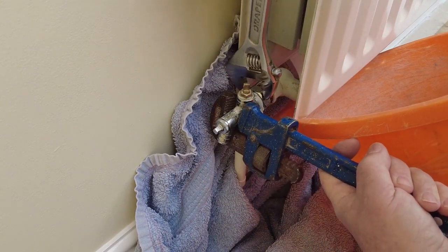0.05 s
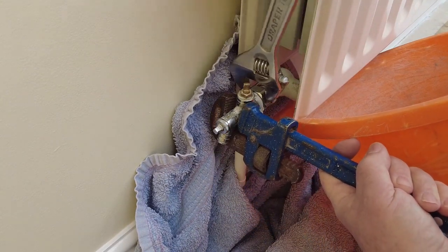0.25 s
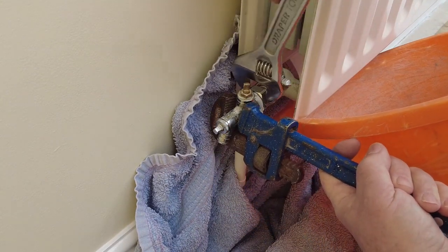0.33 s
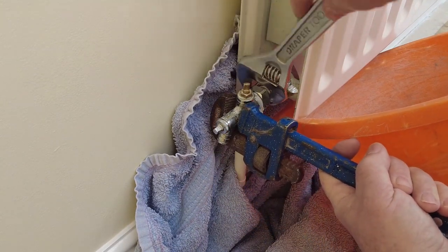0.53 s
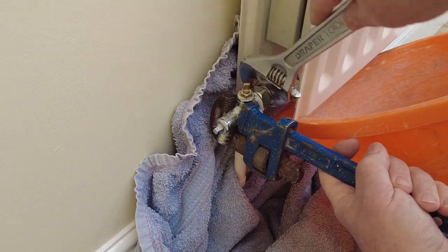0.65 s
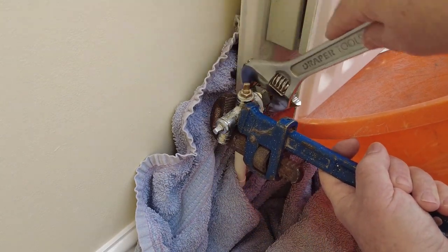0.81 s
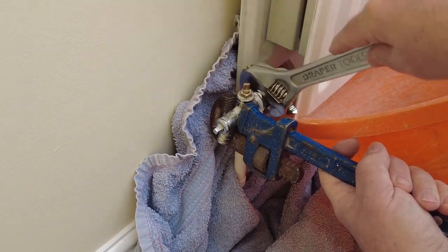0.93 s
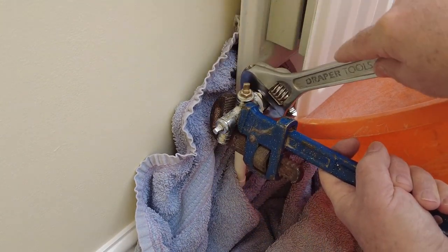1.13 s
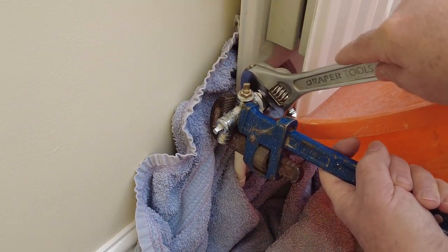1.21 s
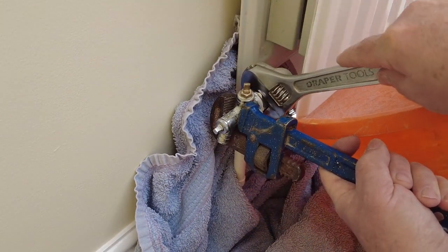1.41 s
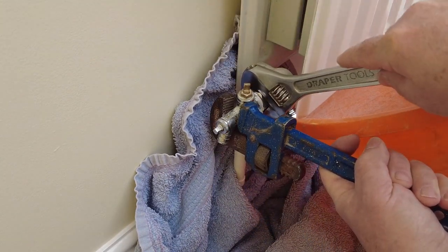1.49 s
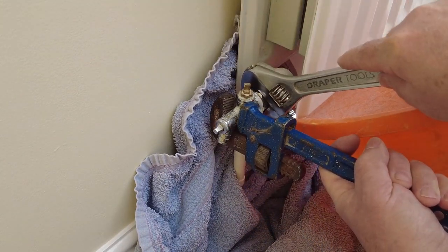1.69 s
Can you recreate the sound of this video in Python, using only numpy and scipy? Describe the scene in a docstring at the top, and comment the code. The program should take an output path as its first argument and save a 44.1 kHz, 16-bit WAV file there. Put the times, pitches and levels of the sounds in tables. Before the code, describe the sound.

A wrench knocks sharply on a radiator valve in a small room, heard close in stereo; faint rubbing and a short squeak lead in, the panel rings hollowly, then a softer knock follows over low hum.

```python
"""A small room, close to the valve of a steel panel radiator that two wrenches work on, in stereo.
A jaw rubs round the nut as a stream of tiny random slips, with hiss, rasp and squeaks.
It slips and knocks home with sharp clicks, then knocks again more softly; each knock is a force pulse
that sets the panel's modes ringing, while clicks excite a cracking, ringing wrench and the room's tail.
Underneath, a wavering low hum swells and fades amid rumble, faint tones and still air."""
import sys
import numpy as np
from scipy import signal
from scipy.io import wavfile

SR = 44100
rng = np.random.default_rng(int(sys.argv[2]) if len(sys.argv) > 2 else 0)


def materialize(psi):
    """Save the field psi as 16-bit PCM at rate SR to the path in sys.argv[1].

    A 1-D psi becomes a single channel; in a 2-D psi each row is a channel.
    """
    bounded = np.clip(np.atleast_2d(psi).T, -1, 1)
    quanta = np.round(bounded * 32767).astype(np.int16)
    wavfile.write(sys.argv[1], SR, quanta)


N = 77175  # samples
T = np.arange(N) / SR  # time in s

# Low hum in the room. Each row: time in seconds, relative level in dB.
HUM_LEVEL = [(0.0, -43), (0.238, -34), (0.33, -51.5), (0.414, -31), (0.516, -32), (0.554, -35),
             (0.662, -39), (0.764, -26.5), (0.944, -48.5), (0.998, -42.5), (1.096, -52), (1.282, -54),
             (1.374, -36.5), (1.408, -61), (1.446, -36), (1.75, -54)]
HUM_HZ, HUM_WAVER_HZ, HUM_DB = 42.2, 1.5, -5.5
# Rumble around the hum. Each row: time in seconds, relative level in dB.
RUMBLE_LEVEL = [(0.0, -47.5), (0.686, -45.5), (0.72, -46.5), (0.808, -40.5), (0.866, -45.5), (0.984, -37.5),
                (1.53, -52), (1.75, -45)]
# Colour of the rumble. Each row: frequency in Hz, relative density in dB per Hz.
RUMBLE_SPECTRUM = [(20, 22), (30, 10.5), (45, -7.5), (72, 19.5), (100, -13), (140, -7), (250, -57.5)]
RUMBLE_DB = 1.5
# Faint wavering tones in the room. Each row: pitch in Hz, relative level in dB.
FAINT_TONES = [(72, -58), (99, -65.5)]
LOW_PAN_DB = -0.77  # hum, rumble and tones: this on the left, its opposite on the right
# Still air of the room. Each row: frequency in Hz, relative density in dB per Hz.
AIR_SPECTRUM = [(100, -4.5), (200, -5.5), (400, -8.5), (800, -9.5), (2000, -20.5), (4000, -27),
                (9000, -32.5), (12000, -48.5), (15000, -90)]
AIR_DB = -66.5
# Left-right likeness of noise in the room. Each row: frequency in Hz, correlation from -1 to 1.
STEREO_LIKENESS = [(50, 0.94), (150, 1), (300, 0.72), (480, 0.4), (750, 0.083), (1400, 0.47), (2800, 0.3),
                   (5000, 0.48), (12000, 0.49)]

# Squeaks of the jaw on the nut. Each row: start in seconds, length in seconds, pitch in Hz, level in dB.
SQUEAK_EVENTS = [(-.06, 0.11, 1790, -72), (0.22, 0.22, 2160, -78), (0.617, 0.032, 1060, -67),
                 (0.713, 0.05, 853, -52.5), (0.714, 0.19, 1802, -68), (0.754, 0.068, 864, -60),
                 (0.901, 0.12, 852, -46), (0.934, 0.058, 785, -53.5), (0.89, 0.14, 1062, -54.5),
                 (0.983, 0.15, 437, -41)]
SQUEAK_WAVER_HZ = 27.4  # pitch jitter
# Rasps of the jaw's edge as it bites. Each row: start in seconds, length in seconds, relative level in dB.
RASP_EVENTS = [(0.188, .21, -78), (0.673, 0.11, -69), (0.866, 0.13, -58), (1.003, .05, -70)]
# Colour of the rasp. Each row: frequency in Hz, relative density in dB per Hz.
RASP_SPECTRUM = [(1500, -29), (2100, 7), (2450, -24), (2800, 3.5), (3150, -7), (3600, -31), (6000, -55)]
RASP_GRAIN_DB, RASP_GRAINS_PER_S = 4.5, 160  # flicker of the rasp's level
# Light slides of the jaw, heard as hiss. Each row: start in seconds, length in seconds, level in dB.
SLIDE_EVENTS = [(0.282, 0.12, -73), (0.85, 0.13, -76)]
# Colour of the hiss. Each row: frequency in Hz, relative density in dB per Hz.
SLIDE_SPECTRUM = [(1000, -31), (3000, -8), (6000, -1), (10000, -9.5), (15000, -18)]

# Force of the jaw rubbing on the nut. Each row: time in seconds, relative force in dB.
RUB_FORCE = [(0, -64), (.18, -77.5), (.27, -61.5), (.35, -57), (.43, -81.5), (.53, -66), (.63, -60.5),
             (.8, -61), (.88, -59.5), (.945, -44.5), (.99, -47), (1.04, -41.5), (1.09, -62), (1.75, -72)]
SLIPS_PER_S, SLIP_SPREAD_DB, RUB_BRIGHT_HZ = 600, 3, 3260
# Colour of the rub at the nut itself. Each row: frequency in Hz, relative density in dB per Hz.
RUB_SPECTRUM = [(150, -20.5), (300, -6), (450, 4), (540, -3.5), (730, 6), (920, -8.5), (1180, 1),
                (1400, -22.5), (2100, -10), (2450, -17), (3050, -21.5), (3600, -24), (12000, -31.5)]
RUB_T60_S, RUB_PANEL_DB, RUB_PANEL_HZ = 0.065, -2.5, 980

# One lingering low ring of the panel. Each row: time in seconds, level in dB.
LOW_RING_LEVEL = [(.15, -80.5), (.3, -70.5), (.95, -64), (1.12, -61.5), (1.22, -43.5), (1.27, -48),
                  (1.34, -57), (1.41, -54), (1.47, -60), (1.53, -51.5), (1.62, -59), (1.75, -66.5)]
LOW_RING_HZ = 264.6

# Knocks that reach the panel. Each row: start in seconds, relative level in dB, contact brightness in Hz.
PANEL_KNOCKS = [(0.354, -47, 480), (0.387, -46.5, 468), (0.439, -53.5, 650), (1.049, -23, 3450),
                (1.057, -25.5, 3030), (1.0705, -21, 760), (1.0773, -25, 675), (1.0848, -24, 4550),
                (1.1024, -31.5, 4380), (1.147, -46, 1184), (1.3823, -48.5, 2370), (1.389, -37.5, 1500),
                (1.3976, -37.5, 1250), (1.4108, -26.5, 366), (1.453, -40.5, 750)]
# Strongest modes of the radiator.
# Each row: pitch in Hz, relative level in dB, t60 in seconds, relative level in dB of the cluster around it.
STRONG_MODES = [(403, -15, 0.34, -10), (435.2, -3, 0.19, -7), (469.8, -18, 0.081, -9),
                (576.4, -11.5, 0.74, -7.5), (610.2, -14.5, 0.33, -8.5), (681, -15.5, 0.33, -14.5),
                (715, -14, 0.52, -15.5), (771.7, -10, 0.4, -9), (854, -14, 0.48, -14),
                (1066, -11, 0.24, -15.5), (1187, -11.5, 0.16, -16), (1240, -8.5, 0.39, -12),
                (1534, -23, 0.43, -16), (1790, -14.5, .35, -19), (1945, -18.5, 0.36, -17.5),
                (2797, -7.5, 0.083, -12.5), (3066, -14.5, 0.16, -14.5)]
MODES_DB, CLUSTER_DB = -8, -9
CLUSTER_WIDTH = 0.071  # share of the pitch
MODE_SKEW_RAD = 0.46  # phase lead or lag at each ear
# The radiator's crowd of weaker modes. Each row: frequency in Hz, relative density in dB per Hz.
CROWD_SPECTRUM = [(100, -1.5), (280, -6.5), (420, 14), (700, -13.5), (1000, 0.5), (1250, 3), (1900, 4),
                  (2350, -3.5), (2800, 7.5), (3200, -18), (3600, -15.5), (6500, -12), (15000, -44)]
CROWD_DB = -16
# Ring time of clusters and crowd. Each row: frequency in Hz, t60 in seconds.
CROWD_T60 = [(200, 0.38), (600, 0.52), (1500, 0.39), (3000, 0.35), (7000, 0.37), (14000, 0.17)]
PANEL_RISE_S = 0.0031
CLANK_DB, CLANK_T60_S = 7, 0.054  # extra ring just after a blow, soon damped by the hand
# Slow bending modes of the panel. Each row: pitch in Hz, relative level in dB, t60 in seconds.
SLOW_MODES = [(200, -17, 1.58), (220.7, -28, 0.88), (253.9, -20, 1.2), (287.3, -18.5, 0.42)]
BENDING_DB, BENDING_RISE_S = -2.5, 0.045

# Steel-on-steel clicks of the jaw. Each row: start in seconds, relative level in dB, brightness in Hz.
JAW_CLICKS = [(1.0085, -44.5, 8000), (1.0482, -27.5, 8880), (1.062, -51, 7000), (1.072, -37, 7000),
              (1.081, -36, 7100), (1.0858, -21, 9000), (1.102, -44.5, 7840), (1.3832, -38.5, 2350),
              (1.589, -58, 3000), (1.7215, -44.5, 2000)]
# Modes of the wrench. Each row: pitch in Hz, relative level in dB, t60 in seconds.
WRENCH_RING = [(4660, -7.5, 0.027), (5010, -24, 0.2), (6440, -7.5, .03), (6460, -35, 0.32),
               (7430, -12.5, 0.021)]
WRENCH_DB = -7
# Colour of the crack and the room's tail. Each row: frequency in Hz, relative density in dB per Hz.
CRACK_SPECTRUM = [(500, 1), (1500, 15), (3800, -7.5), (5000, -8), (7500, -0.5), (10000, -12.5),
                  (15000, -8.5)]
CRACK_DB, CRACK_T60_S, CRACK_RISE_S = -7, 0.021, 0.00032
ROOM_DB, ROOM_T60_S = -19.5, 0.2

# The pipe judders for a few cycles as a knock drives the nut round.
# Each row: start in seconds, length in seconds, pitch in Hz, level in dB.
PIPE_JUDDERS = [(1.073, 0.025, 456.4, -31), (1.406, 0.031, 419, -43)]

STOPBAND_HZ, STOPBAND_DB = 16000, 70


def from_db(db):
    """Decibels to gain."""
    return 10 ** (np.asarray(db) / 20)


def rms_one(x):
    """Scale to rms 1."""
    return x / np.sqrt(np.mean(x ** 2) + 1e-20)


def level(rows):
    """A (s, dB) curve as a gain per sample."""
    return from_db(np.interp(T, *np.transpose(rows)))


def at_hz(points, hz):
    """Read a table on a log-frequency axis."""
    table_hz, values = np.transpose(points)
    return np.interp(np.log(hz), np.log(table_hz), values)


def dying(t60):
    """Exponential decay from 1, down 60 dB after t60 seconds."""
    return np.exp(-np.log(1000) * T / t60)


def rising(seconds):
    """Exponential approach to 1."""
    return 1 - np.exp(-T / seconds)


def swell(start, length):
    """A smooth rise and fall."""
    return np.sin(np.pi * np.clip((T - start) / length, 0, 1))


def soften(x, hz):
    """A softer contact loses its treble."""
    lowpass = signal.butter(2, min(hz, .45 * SR), fs=SR, output="sos")
    return signal.sosfilt(lowpass, x + 1e-18)


def wander(rate):
    """A random curve through a new normal value rate times a second."""
    return np.interp(T * rate, np.arange(1000), rng.standard_normal(1000))


def wavering_tone(hz, waver_hz, rate):
    """A sine of rms 1 whose pitch wanders."""
    cycles = np.cumsum(hz + waver_hz * wander(rate)) / SR
    return np.sqrt(2) * np.sin(2 * np.pi * cycles)


def stereo_band(white, low, high):
    """One band of two white noises, as alike left and right as the room makes it."""
    bandpass = signal.butter(2, [low, high], "band", fs=SR, output="sos")
    mid, side = signal.sosfilt(bandpass, white)[:, -N:]  # the filter's settling is dropped
    alike = np.clip(at_hz(STEREO_LIKENESS, np.sqrt(low * high)), -1, 1)
    return np.sqrt(1 + alike) * mid + np.sqrt(1 - alike) * side * [[1], [-1]]


def bands(spectrum, count=4):
    """Stereo noise split into count bands an octave, as (Hz, signal); together rms 1."""
    edges = 18 * 2 ** (np.arange(10 * count + 1) / count)  # ten octaves up from 18 Hz
    white = rng.standard_normal((2, 2, N + SR // 4))
    parts = []
    for k, (low, high) in enumerate(zip(edges, edges[1:])):
        hz = np.sqrt(low * high)
        # neighbouring bands take turns between two noise pairs
        parts.append((hz, from_db(at_hz(spectrum, hz)) * stereo_band(white[k % 2], low, high)))
    total = sum(part for _, part in parts).std()
    return [(hz, part / total) for hz, part in parts]


def noise(spectrum, count=2):
    """Coloured stereo noise, rms 1."""
    return sum(part for _, part in bands(spectrum, count))


def ear_skew(k):
    """Opposite phase offsets for the two ears, swapped from mode to mode."""
    return MODE_SKEW_RAD * (-1) ** k * np.array([[1], [-1]])


def ringing(modes):
    """Struck modes as decaying sines, each reaching the two ears a little out of step."""
    out = 0
    for k, (hz, db, t60) in enumerate(modes):
        sine = np.sin(2 * np.pi * hz * T + ear_skew(k))
        out = out + (-1) ** k * from_db(db) * dying(t60) * sine
    return out


def blows(rows):
    """One softened force pulse per row."""
    return sum(soften(from_db(db) * signal.unit_impulse(N, int(s * SR)), hz) for s, db, hz in rows)


def excite(body, force):
    """A body's answer to a force, by convolution."""
    return signal.fftconvolve(body, force[None], axes=1)[:, :N]


def background():
    """A wavering low hum, rumble, faint tones and the still air of the room."""
    hum = from_db(HUM_DB) * level(HUM_LEVEL) * wavering_tone(HUM_HZ, HUM_WAVER_HZ, rate=12.6)
    rumble = from_db(RUMBLE_DB) * level(RUMBLE_LEVEL) * noise(RUMBLE_SPECTRUM)
    tones = sum(from_db(db) * wavering_tone(hz, waver_hz=6.5, rate=51) for hz, db in FAINT_TONES)
    pan = from_db([[LOW_PAN_DB], [-LOW_PAN_DB]])
    return (hum + rumble + tones) * pan + from_db(AIR_DB) * noise(AIR_SPECTRUM)


def sliding():
    """The jaw hisses over the brass, rasps and squeaks where it grips."""
    squeaks = sum(from_db(db) * swell(s, length) * wavering_tone(hz, SQUEAK_WAVER_HZ, rate=280)
                  for s, length, hz, db in SQUEAK_EVENTS)
    rasp_level = sum(from_db(db) * swell(s, length) for s, length, db in RASP_EVENTS)
    grain = from_db(RASP_GRAIN_DB * wander(RASP_GRAINS_PER_S))
    rasp = noise(RASP_SPECTRUM, count=5) * rasp_level * grain
    hiss_level = sum(from_db(db) * swell(s, length) for s, length, db in SLIDE_EVENTS)
    hiss = noise(SLIDE_SPECTRUM) * hiss_level
    return hiss + rasp + squeaks


def clank():
    """A blow takes a moment to spread over the steel and is loudest at first."""
    return rising(PANEL_RISE_S) * (1 + from_db(CLANK_DB) * dying(CLANK_T60_S))


def panel():
    """The radiator's answer to one tiny push: its strong modes ring and die."""
    return ringing([mode[:3] for mode in STRONG_MODES]) * clank()


def rubbing(radiator):
    """Tiny uneven slips of the jaw rasp on the nut and shake the panel."""
    happens = rng.random(N) < SLIPS_PER_S / SR
    strength = from_db(SLIP_SPREAD_DB * rng.standard_normal(N))
    slips = happens * strength * rng.choice([-1, 1], N)
    force = soften(rms_one(slips) * level(RUB_FORCE), RUB_BRIGHT_HZ)
    nut = rms_one(noise(RUB_SPECTRUM, count=3) * dying(RUB_T60_S))
    shaken_panel = from_db(RUB_PANEL_DB) * rms_one(soften(radiator, RUB_PANEL_HZ))
    return excite((nut + shaken_panel) / np.sqrt(N), force)


def low_ring():
    """One low ring of the panel lingers and swells, its pitch wavering."""
    return level(LOW_RING_LEVEL) * wavering_tone(LOW_RING_HZ, waver_hz=2.9, rate=25)


def clusters():
    """Each strong mode rings amid a cluster of close, beating ones, as (Hz, t60 s, signal)."""
    parts = []
    for k, (hz, db, t60, cluster_db) in enumerate(STRONG_MODES):
        half = CLUSTER_WIDTH * hz / 2
        close = rms_one(stereo_band(rng.standard_normal((2, N + SR // 4)), hz - half, hz + half))
        sine = np.sin(2 * np.pi * (hz * T + rng.random()) + ear_skew(k))
        parts.append((hz, t60, from_db(MODES_DB + db) * sine))
        parts.append((hz, at_hz(CROWD_T60, hz), from_db(CLUSTER_DB + cluster_db) * close))
    return parts


def knocking():
    """Each knock stirs the radiator's modes afresh; their energies add and die mode by mode."""
    out, shape = 0, clank()
    crowd = [(hz, at_hz(CROWD_T60, hz), from_db(CROWD_DB) * part) for hz, part in bands(CROWD_SPECTRUM)]
    for hz, t60, part in clusters() + crowd:
        tail = (shape * dying(t60)) ** 2
        energy = np.zeros(N)
        for s, db, bright_hz in PANEL_KNOCKS:
            start = int(s * SR)
            softness = 1 / (1 + (hz / bright_hz) ** 4)  # a dull contact stirs the high modes less
            energy[start:] += from_db(db) ** 2 * softness * tail[:N - start]
        out = out + part * np.sqrt(energy)
    return out


def bending():
    """The knocks slowly set the whole panel bending."""
    body = from_db(BENDING_DB) * ringing(SLOW_MODES) * rising(BENDING_RISE_S)
    return excite(body, blows(PANEL_KNOCKS))


def wrench():
    """The wrench's answer to a click: a crack, a short high ring and the room's tail."""
    decay = from_db(CRACK_DB) * dying(CRACK_T60_S) + from_db(ROOM_DB) * dying(ROOM_T60_S)
    crack = noise(CRACK_SPECTRUM) * decay
    return (crack + from_db(WRENCH_DB) * ringing(WRENCH_RING)) * rising(CRACK_RISE_S)


def clicking():
    """Steel-on-steel contacts of the jaw excite the wrench."""
    return excite(wrench(), blows(JAW_CLICKS))


def judder():
    """Short dull thuds of the pipe, a few cycles of a sine each."""
    return sum(from_db(db) * swell(s, length) * np.sqrt(2) * np.sin(2 * np.pi * hz * (T - s))
               for s, length, hz, db in PIPE_JUDDERS)


def scene():
    """All sources together."""
    jaw = sliding() + rubbing(panel())
    radiator = low_ring() + knocking() + bending()
    return background() + jaw + radiator + clicking() + judder()


def record(dry):
    """The top is cut steeply."""
    lowpass = signal.cheby2(14, STOPBAND_DB, STOPBAND_HZ, fs=SR, output="sos")
    return signal.sosfilt(lowpass, dry)


dry = scene()
out = record(dry)
materialize(out)
```